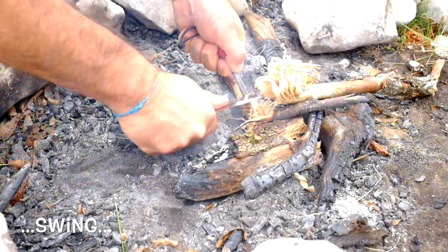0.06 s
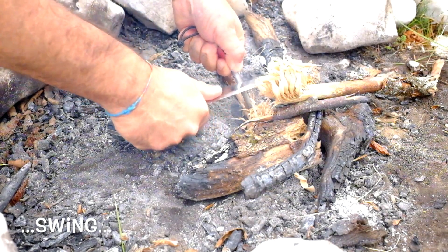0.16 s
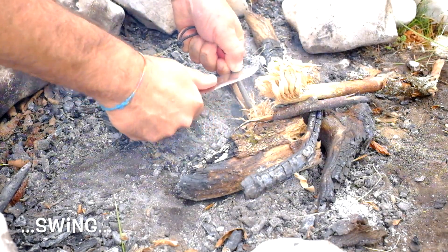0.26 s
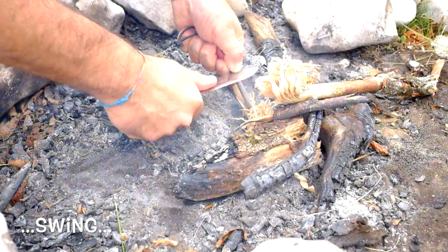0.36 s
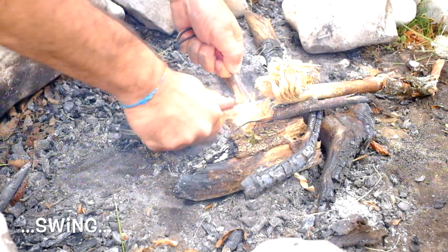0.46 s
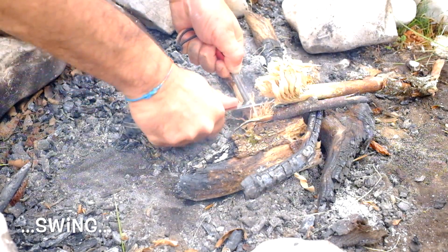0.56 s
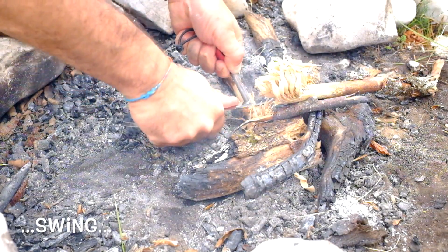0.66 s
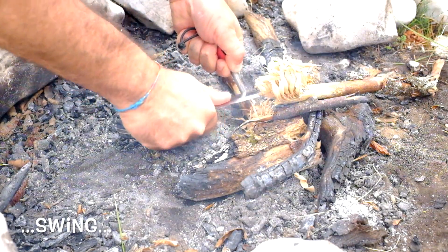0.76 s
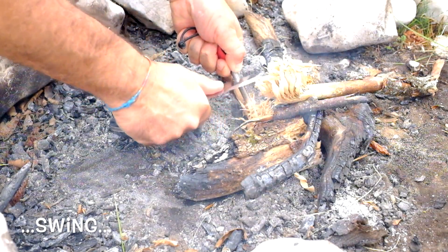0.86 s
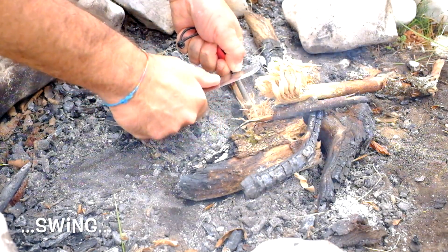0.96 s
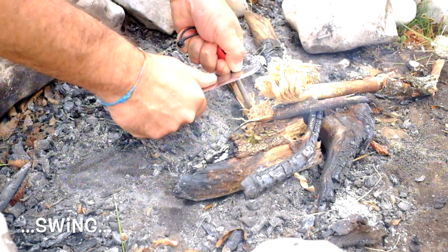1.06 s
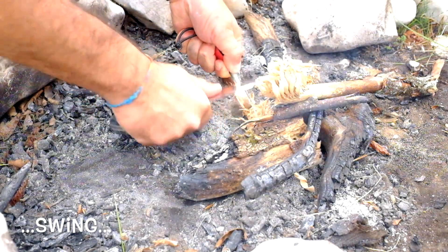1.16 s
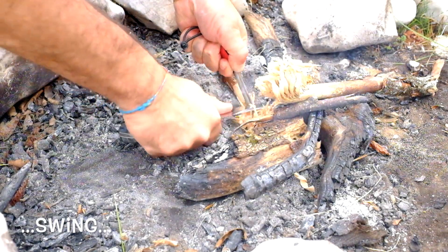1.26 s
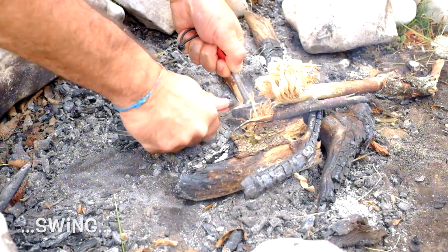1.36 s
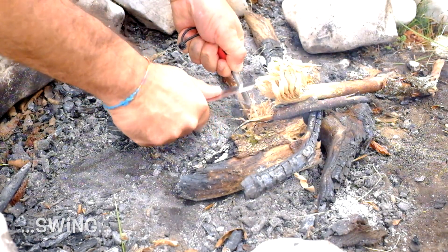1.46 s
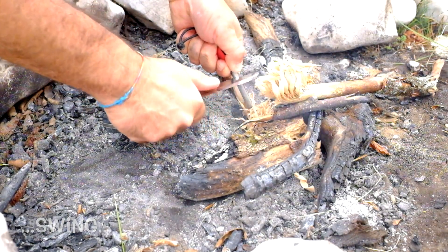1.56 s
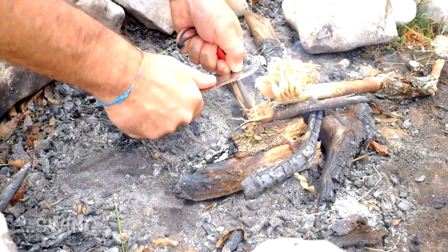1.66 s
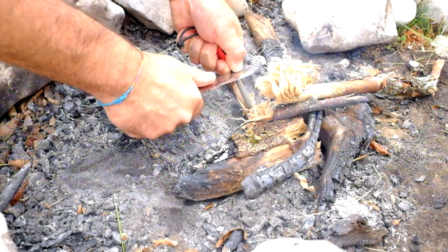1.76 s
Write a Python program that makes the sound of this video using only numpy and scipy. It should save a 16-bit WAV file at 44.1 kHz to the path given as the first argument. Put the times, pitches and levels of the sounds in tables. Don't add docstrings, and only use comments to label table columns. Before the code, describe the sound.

A knife spine scrapes a spark rod propped on a stick: a light drag, a hard grating stroke, a broken return drag, a second hard stroke, then soft drags. Close small camera microphone outdoors, with quiet air hiss.

```python
import sys
import numpy as np
from scipy import signal
from scipy.fft import rfft, irfft, next_fast_len
from scipy.io import wavfile
from scipy.ndimage import uniform_filter1d, map_coordinates

SR = 44100
rng = np.random.default_rng(int(sys.argv[2]) if len(sys.argv) > 2 else 0)


def convert_level_to_amplitude(level_db):
    exponent = np.asarray(level_db, float) / 20
    return 10 ** exponent


def output_pcm(signal):
    pcm = np.clip(np.atleast_2d(signal).T, -1, 1) * 32767
    wavfile.write(sys.argv[1], SR, np.round(pcm).astype(np.int16))


N = 81585
T = np.arange(N) / SR
HZ = np.fft.rfftfreq(next_fast_len(N + 8192), 1 / SR)

# pitch_hz, level_db (per Hz)
AIR_SPECTRUM = [(15, -66), (25, -4), (134, -7.5), (545, -18.5), (2280, -27), (3340, -30), (4870, -30),
                (14800, -32.5), (16000, -33)]
# pitch_hz, side_over_mid_db
AIR_WIDTH = [(60, -24), (400, -15), (2400, -6), (15000, -4.5)]
# pitch_hz, level_db
CIRCUIT_TONES = [(1000, -94), (2000, -90), (5000, -92)]
# start_s, level_db, pitch_hz
STICK_THUDS = [
    (.005, -50, 130),
    (0.322, -30, 133.5),
    (0.484, -28, 162),
    (0.557, -22.5, 155),
    (1.066, -35, 137),
    (1.716, -36.5, 127.4),
]
# start_s, length_s, from_hz, to_hz, level_db
BLADE_SINGS = [(.02, .012, 5050, 4950, -61.5), (.028, 0.021, 4450, 4130, -67),
               (.046, 0.015, 3400, 3300, -67), (.19, 0.14, 4050, 4040, -67.5),
               (.222, 0.015, 4050, 4050, -66), (.308, 0.011, 3200, 3200, -54),
               (.475, 0.079, 4050, 4020, -56), (.54, .035, 3700, 3570, -51),
               (.76, 0.063, 3500, 3630, -65.5), (.847, 0.093, 4000, 4120, -59),
               (1.228, 0.087, 4050, 4090, -54), (1.236, 0.072, 5600, 5540, -49),
               (1.44, 0.17, 3950, 3925, -63), (1.54, 0.043, 2190, 2040, -56.5)]
# start_s, length_s, from_hz, to_hz, level_db
MODE_SLIDES = [
    (.245, 0.08, 1900, 2556, -55),
    (0.461, 0.046, 260, 332, -38),
    (0.51, 0.0488, 421.4, 241, -32.5),
    (0.848, 0.13, 524.2, 600.6, -47.5),
    (1.253, 0.061, 520, 640, -35),
    (1.53, 0.055, 540.5, 479, -47.5),
    (.135, 0.062, 4200, 4715, -56),
    (1.674, 0.033, 2335, 1984, -59),
]
# start_s, level_db (pressure), steel_over_wood_db (speed), stick_load_db
FIRST_DRAG = [
    (.082, -63, -14, 17.5),
    (.112, -47.5, -13.5, 2.5),
    (.134, -47.5, -7.5, -3),
    (.157, -39.5, -12.5, -9.5),
    (.188, -50, -9.5, -1),
    (.2, -52, -4.5, 1.5),
    (.24, -62.5, 2, 6.5),
    (.3, -55, -5.5, -2),
    (.323, -56.5, -5, 7.5),
]
FIRST_STRIKE = [
    (0.453, -62.5, -12, 7),
    (0.475, -48, 3.5, -3.5),
    (.505, -43, 1, 3),
    (.525, -35.5, -7.5, -2.5),
    (.55, -34.5, -10.5, -7),
    (0.566, -30.5, -17, -8),
    (.578, -40.5, -17.5, -2),
    (.603, -47, -14, 5.5),
    (0.611, -55, -29, 1),
]
RETURN_TOUCH = [
    (.686, -59, 0, -13),
    (0.706, -57.5, -7, -24),
    (.72, -56.5, -12, -19),
    (0.736, -55.5, -14, -10),
    (0.75, -47, -16, -13),
]
RETURN_DRAG = [
    (0.746, -53, -13, -9),
    (0.772, -47, -17, 0),
    (.8, -53, -25, 4),
    (.81, -54.5, -14, 8),
    (.845, -51, -17, -1),
    (.852, -60, -12, 4),
]
RETURN_DRAG_ON = [
    (.846, -49.5, -9, -2),
    (.886, -47.5, -17.5, -6),
    (.91, -55.5, -7, 2),
    (.935, -42, -14, -5),
    (.96, -48.5, -11.5, 2),
    (.975, -48.5, -7, 0),
    (1.0, -48, -20, 0.5),
    (1.022, -55.5, -9, -1),
    (1.031, -58, -15, 0),
]
HAND_REST = [
    (1.07, -66.5, -13, 4.2),
    (1.13, -63.5, -5, 6),
    (1.211, -61, -21, 1.9),
]
SECOND_STRIKE = [
    (1.212, -65, -11, 4),
    (1.232, -47.5, 1.5, 3.5),
    (1.252, -43, 0, 9),
    (1.263, -37.5, -2, -6),
    (1.28, -27.5, -12, -18),
    (1.303, -29.5, -13, -11.5),
    (1.32, -37.5, -10.5, 1),
    (1.362, -48.5, -12, -8),
    (1.372, -51, -19, -7),
]
SOFT_DRAG = [
    (1.415, -73, -25, 27),
    (1.439, -63.5, -14, 16),
    (1.456, -56.5, -13, 11.5),
    (1.486, -52, -9, 5),
    (1.526, -50, -6.5, -3),
    (1.56, -48.5, -11.5, 0.5),
    (1.6, -56, -13, 4.5),
    (1.633, -75, -10, 19.5),
    (1.64, -84, -3, 15),
]
LAST_DRAG = [
    (1.645, -71, -9, 17),
    (1.66, -57.5, -13, 1),
    (1.685, -57.5, -6.5, 5.5),
    (1.708, -57, -2.5, 2),
    (1.72, -58, -11, 13),
]
STROKES = (FIRST_DRAG, FIRST_STRIKE, RETURN_TOUCH, RETURN_DRAG, RETURN_DRAG_ON, SECOND_STRIKE, SOFT_DRAG,
           LAST_DRAG, HAND_REST)
# start_s, level_db, length_s, steel_over_wood_db, pitch_hz
BLADE_SCUFFS = [(.042, -48.5, 0.0024, -13, 1750), (0.09, -50, 0.0018, -2, 1140),
                (0.111, -51, 0.0076, -13, 1470), (0.144, -41, .005, -16.5, 1250),
                (0.163, -47, 0.0041, -14, 1260), (0.187, -46, 0.0048, -21, 1287),
                (0.614, -41, 0.0031, -29, 1510), (0.665, -52.5, 0.0077, -9, 1300),
                (0.707, -52, 0.0093, -15, 1430), (0.625, -34.5, 0.015, -20.5, 1130),
                (0.637, -46.5, 0.02, -9.5, 1010), (0.749, -40, 0.012, -12, 1020),
                (0.768, -49, 0.011, -14, 1110), (0.897, -47.5, 0.0058, -23, 2150),
                (0.794, -34.5, 0.0036, -13.5, 1200), (0.926, -37.5, 0.0084, -9, 1300),
                (0.94, -41, 0.0019, -15, 930), (0.968, -50.5, 0.0078, -1.5, 1090),
                (0.99, -50.5, 0.0027, 0.5, 880), (1.006, -43, 0.0094, -7, 1240),
                (1.017, -45, 0.0015, -3, 800), (1.045, -41.5, 0.037, -15, 1100),
                (1.062, -37, 0.0071, -3.5, 1200), (1.131, -45, 0.016, -5.5, 1740),
                (1.147, -36.5, 0.0042, -19, 1070), (1.154, -44.5, 0.0074, -16, 1110),
                (1.169, -49.5, 0.012, -3.5, 1300), (1.32, -47, 0.0034, -3, 890),
                (0.315, -54, 0.0063, -5.5, 2580), (1.397, -42.5, 0.0036, -15.5, 1070),
                (1.478, -50.5, 0.0024, -8, 700), (1.768, -48, 0.0037, -11.5, 1090)]
# pitch_hz, width_hz, level_db
STICK_MODES = [(147, 51.2, 4.5), (219.2, 29.8, 1.5), (281.4, 44, -1)]
WOOD_MODES = [(415, 300, -3), (640, 194, 2.5), (800, 107, -0.5), (1031, 126, -0.5), (1316, 163, -1.5),
              (1900, 98, -8.5), (2583, 370, -16)]
STEEL_MODES = [(3632, 187, 1), (4010, 170, 3.5), (4200, 100, -4.5), (5505, 560, -4.5), (6510, 100, -5.5),
               (6800, 330, -4.5), (8040, 650, -2.5), (8900, 760, -5), (12100, 390, -4),
               (14200, 2800, -13.5)]
# pitch_hz, level_db
BLADE_GRATE = [(1500, -8.5), (2500, -5), (5000, -6.5), (8000, -26), (11000, -10.5), (16000, -47)]
SPEED_BANDS = [6300, 9400, 12700]
# start_s, level_db
EDGE_SNAPS = [
    (.536, -40),
    (0.929, -43.5),
    (1.276, -46),
    (1.322, -49),
    (1.051, -60),
    (1.061, -38),
]
# start_s, level_db
WOOD_KNOCKS = [(0.1023, -15.5), (.491, -24.5), (.532, -19.5), (.539, -23), (.557, -23), (.561, -19),
               (.567, -18.5), (.59, -30), (.796, -38), (.786, -39), (.942, -29), (1.018, -29),
               (1.064, -26.5), (1.269, -18.5), (1.274, -21), (1.279, -21.5), (1.292, -26), (1.301, -17),
               (1.554, -29), (1.564, -44)]
SIDE_LIMITS = [-27, -13]


def unit(x):
    return x / np.sqrt(np.mean(np.abs(x) ** 2) + 1e-20)


def along(points):
    hz, db = np.transpose(points)
    return convert_level_to_amplitude(np.interp(np.log(HZ + 1), np.log(hz + 1), db))


def filtered(x, response):
    size = 2 * (len(HZ) - 1)
    return irfft(rfft(x, size) * response, size)[..., :N]


def resonances(modes):
    total = 0
    for k, (hz, width, db) in enumerate(modes):
        total = total + (-1) ** k * convert_level_to_amplitude(db) * 1j * HZ * width / (hz * hz - HZ ** 2 + 1j * HZ * width)
    return total


def wobble(rate):
    return map_coordinates(rng.standard_normal(N // 50), [T * rate])


def grit(share, spread_db):
    catches_per_s, one_way, flat_top, chatter_db = 900, 0.8, 0.04, 1.5
    chance, way, size = rng.random((3, N))
    caught = chance < catches_per_s / SR
    catches = caught * np.sign(way - one_way) * convert_level_to_amplitude(-spread_db * np.log(size + flat_top))
    mix = share * unit(catches) + (1 - share) * rng.standard_normal(N)
    return unit(mix * convert_level_to_amplitude(chatter_db * (wobble(60.37) + wobble(220))))


def air():
    level_db = -59.5
    widths = [np.ones_like(HZ), along(AIR_WIDTH)]
    mid, side = filtered(rng.standard_normal((2, N)), along(AIR_SPECTRUM) * widths)
    whine = sum(convert_level_to_amplitude(db) * np.sin(2 * np.pi * hz * T) for hz, db in CIRCUIT_TONES)
    return convert_level_to_amplitude(level_db) * np.array([mid + side, mid - side]) / np.std(mid) + [whine, -whine]


def thuds():
    rise_s, t60_s, sag_s, settle_s = 0.0034, 0.057, 0.00216, 0.016
    out = np.zeros(N)
    for s, db, hz in STICK_THUDS:
        t = np.clip(T - s, 0, None)
        phase = 2 * np.pi * hz * (t + sag_s * (1 - np.exp(-t / settle_s)))
        rise = (1 - np.exp(-t / rise_s)) ** 2
        out += convert_level_to_amplitude(db + 8.5 - 60 * t / t60_s) * rise * np.sin(phase)
    return out


def slides(rows, q, swell):
    out = np.zeros(N)
    rub = [grit(share=0.5, spread_db=4), grit(share=0.5, spread_db=4)]
    for s, length, from_hz, to_hz, db in rows:
        u = np.clip((T - s) / length, 0, 1)
        phase = 2 * np.pi * np.cumsum(from_hz + (to_hz - from_hz) * u) / SR
        moved = np.roll(rub, rng.integers(N), axis=1)
        a, b = unit(filtered(moved, 1 / (1 + 2j * HZ * q / to_hz)))
        swelling = np.clip(np.minimum(swell * u, 8 * (1 - u)), 0, 1)
        out += convert_level_to_amplitude(db) * swelling * (a * np.cos(phase) + b * np.sin(phase))
    return out


def contact():
    edge_s, scuff_wood_share = 0.0039, 0.45
    wood, steel, stick, scuff = np.zeros((4, N))
    for rows in STROKES:
        s, db, fast_db, load_db = np.transpose(rows)
        edges = np.clip(np.minimum(T - s[0], s[-1] - T) / edge_s, 0, 1)
        force = convert_level_to_amplitude(np.interp(T, s, db)) * edges
        wood += force
        steel += force * convert_level_to_amplitude(np.interp(T, s, fast_db))
        stick += force * convert_level_to_amplitude(np.interp(T, s, load_db))
    for s, db, length, fast_db, hz in BLADE_SCUFFS:
        force = convert_level_to_amplitude(db) * np.sin(np.pi * np.clip((T - s) / length, 0, 1) ** 0.42)
        wood += scuff_wood_share * force
        scuff += force * convert_level_to_amplitude(fast_db)
    return wood, steel, stick, scuff


def scraping():
    sway_db, sway_per_s = 1.6, 45
    top_lag_s, top_grows, top_ref_db, scuff_top_db = 0.015, 0.27, -39, -1
    wood, steel, stick, scuff = contact()
    coarse = grit(share=0.43, spread_db=7.5)
    fine = 0.46 * coarse + 0.91 * grit(share=0.44, spread_db=6)

    modes = [(-1) ** k * resonances([mode]) for k, mode in enumerate(WOOD_MODES)]
    sway = convert_level_to_amplitude(sway_db * np.array([wobble(sway_per_s) for mode in WOOD_MODES]))
    out = convert_level_to_amplitude(-0.5) * filtered(wood * coarse * sway, modes / np.std(sum(modes))).sum(axis=0)

    stick_grit = stick * grit(share=0.19, spread_db=3.0)
    out += convert_level_to_amplitude(3.5) * filtered(stick_grit, unit(resonances(STICK_MODES)))

    blade = unit(resonances(STEEL_MODES) + 1j * along(BLADE_GRATE))
    below = [0] + [1 / (1 + (HZ / hz) ** 8) for hz in SPEED_BANDS] + [1]
    for k in range(4):
        late = np.minimum(np.interp(T - k * top_lag_s, T, steel), steel)
        opened = steel * (late / convert_level_to_amplitude(top_ref_db)) ** (k * top_grows)
        force = opened + scuff * convert_level_to_amplitude(k * scuff_top_db)
        out += convert_level_to_amplitude(2.5) * filtered(force * fine, blade * (below[k + 1] - below[k]))
    return out


def scuff_rings():
    ring_db, ring_s = -1.5, 0.0017
    out, t = np.zeros(N + SR), np.arange(SR // 20) / SR
    for s, db, length, fast_db, hz in BLADE_SCUFFS:
        rub = np.sin(np.pi * np.clip(t / length, 0, 1) ** 0.5) * rng.standard_normal(len(t))
        ring = np.exp(-t / ring_s) * np.sin(2 * np.pi * hz * t)
        rung = np.convolve(rub, ring / np.linalg.norm(ring))[:len(t)]
        out[round(s * SR):][:len(t)] += convert_level_to_amplitude(db + ring_db) * rung
    return out[:N]


def knocks():
    soft_hz = 1300
    blows = np.zeros(N)
    for s, db in WOOD_KNOCKS:
        blows[round(s * SR)] = -convert_level_to_amplitude(db + 25.5)
    return filtered(blows, resonances(WOOD_MODES) / (1 + 1j * HZ / soft_hz) ** 2)


def snaps():
    crack_s = 0.00057
    out, t = np.zeros(N + SR), np.arange(SR // 20) / SR
    for s, db in EDGE_SNAPS:
        bright = np.convolve(rng.standard_normal(len(t)), [1, 0, -1])[:len(t)]
        out[round(s * SR):][:len(t)] += convert_level_to_amplitude(db) * np.exp(-t / crack_s) * bright
    return out[:N]


def scene():
    near = scraping() + scuff_rings() + snaps()
    near += slides(MODE_SLIDES, q=6, swell=2.4) + slides(BLADE_SINGS, q=22, swell=5.4)
    near += knocks() + thuds()
    small_source = (1j * HZ / (1j * HZ + 70)) ** 2
    return filtered(near, small_source) + air()


def band_power(z):
    return uniform_filter1d(np.abs(z) ** 2, size=24, axis=0)[12::24].repeat(24, axis=0)


def low_pass(x):
    return signal.sosfilt(signal.butter(12, 16250, fs=SR, output="sos"), x)


def record(dry):
    top_hz = 15850
    left, right = filtered(dry, HZ < top_hz)
    mid, side = signal.stft([left + right, left - right], nperseg=2048)[2]
    limit_db = np.where(np.arange(1032) < 24, *SIDE_LIMITS)
    keep = band_power(side) > band_power(mid) * convert_level_to_amplitude(2 * limit_db)[:, None]
    side = signal.istft(side * keep[:len(side)], nperseg=2048)[1][:N] / 2
    mid = (left + right) / 2
    return low_pass(np.array([mid + side, mid - side]))


dry = scene()
out = record(dry)
output_pcm(out)
```